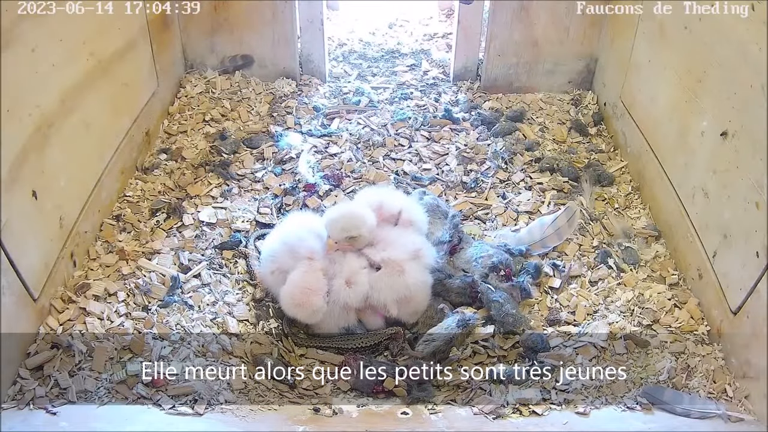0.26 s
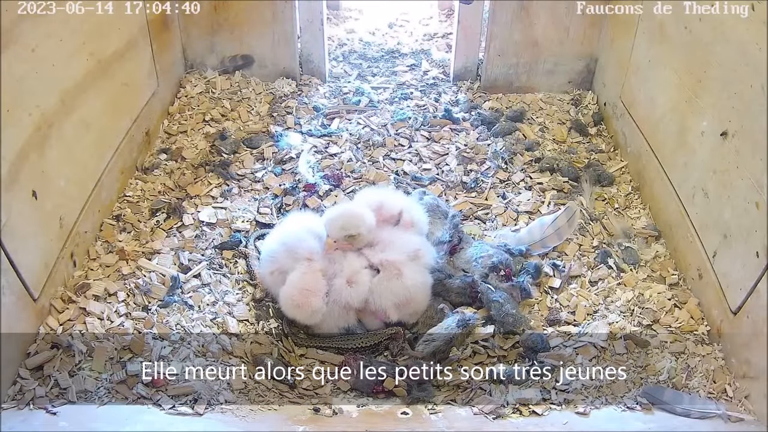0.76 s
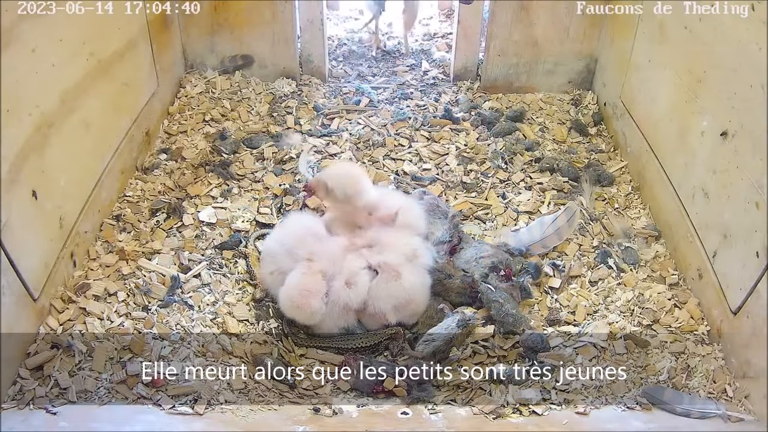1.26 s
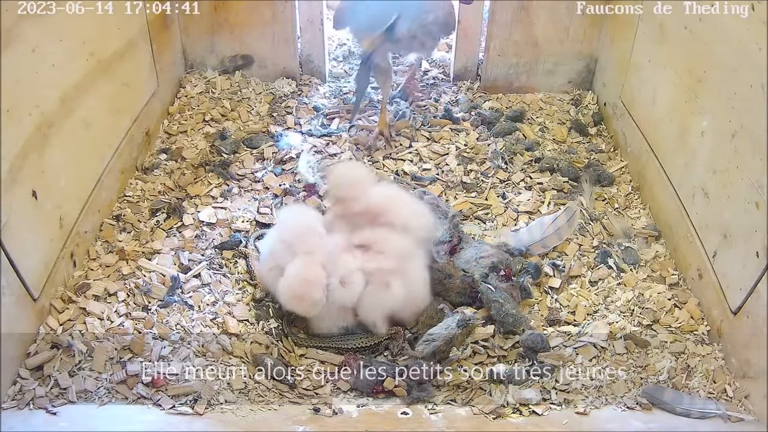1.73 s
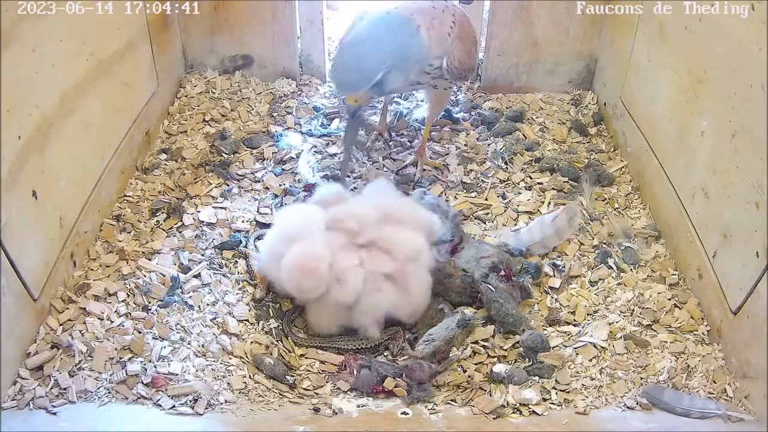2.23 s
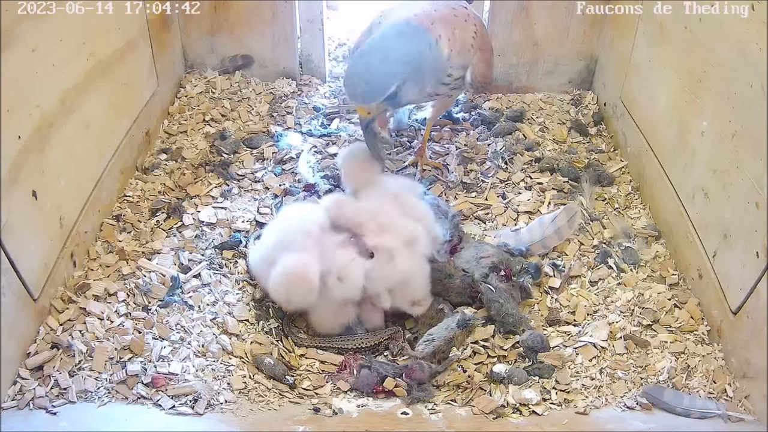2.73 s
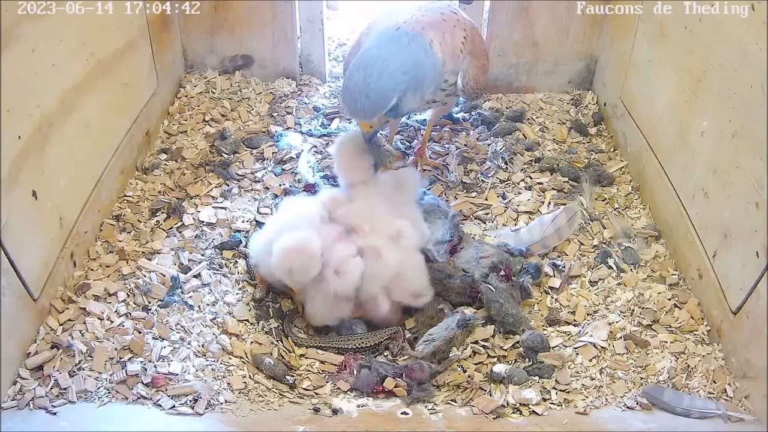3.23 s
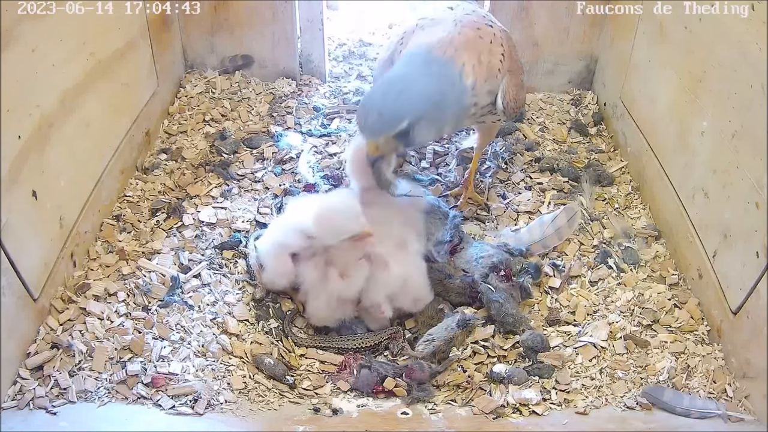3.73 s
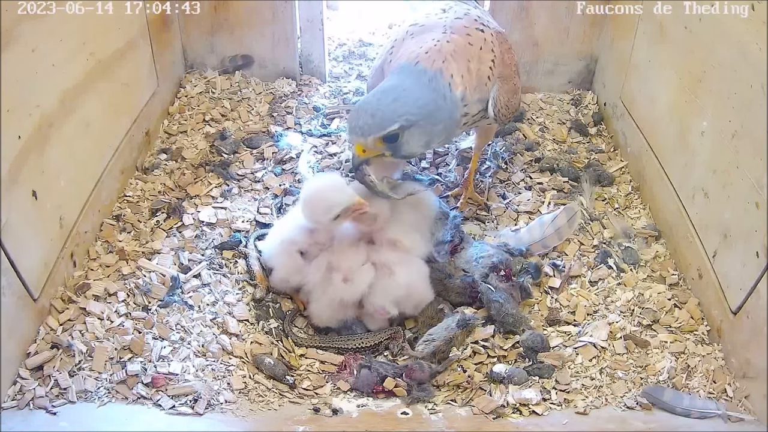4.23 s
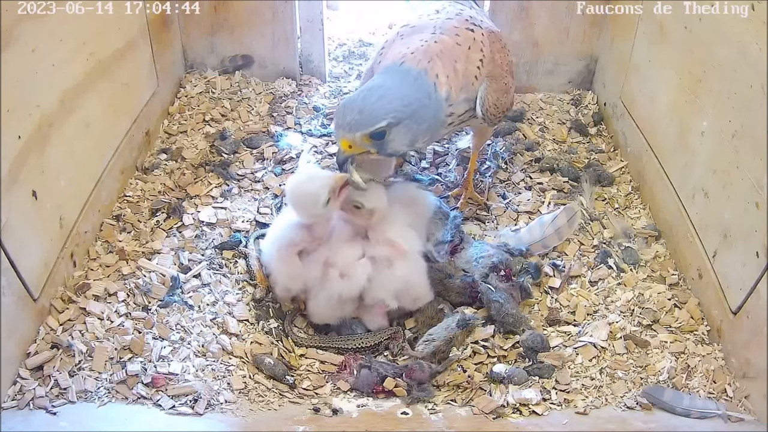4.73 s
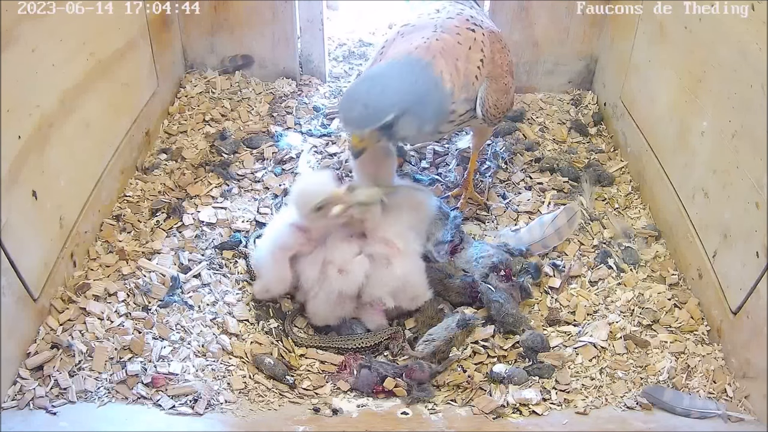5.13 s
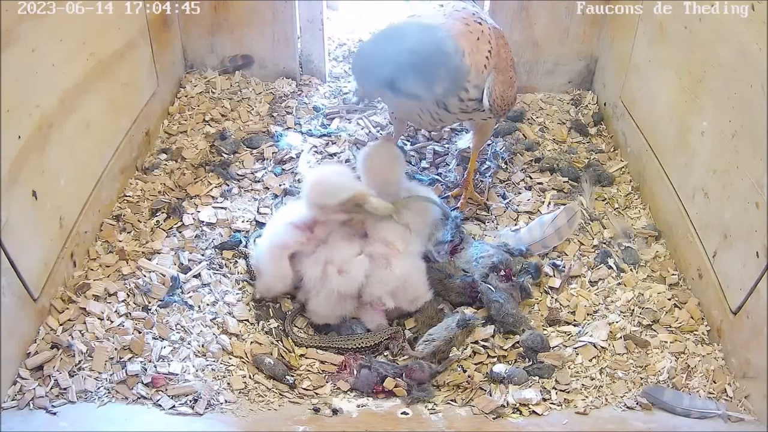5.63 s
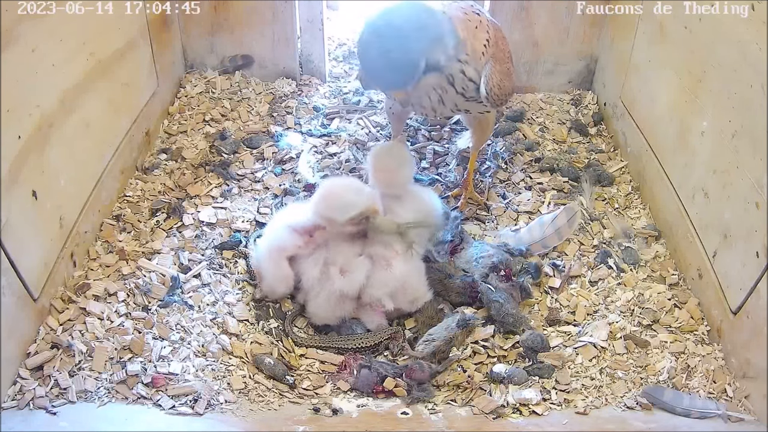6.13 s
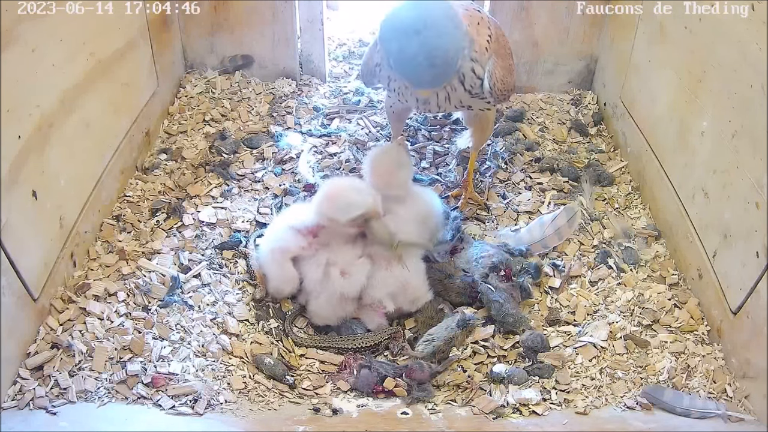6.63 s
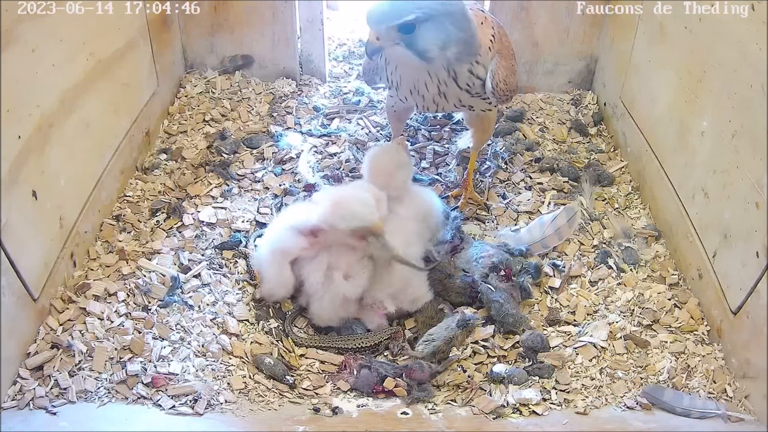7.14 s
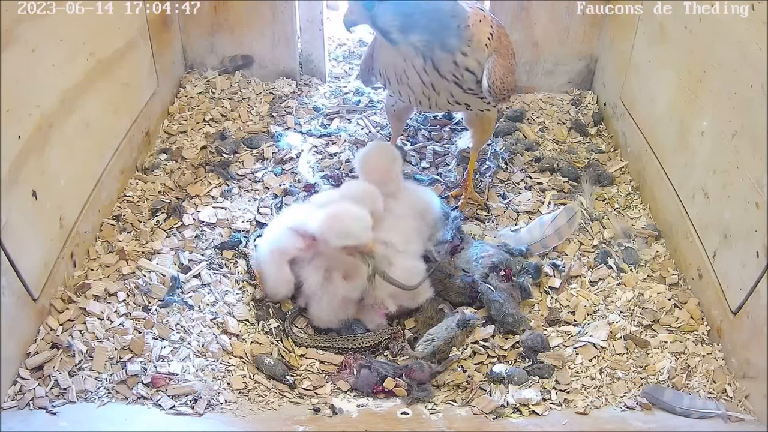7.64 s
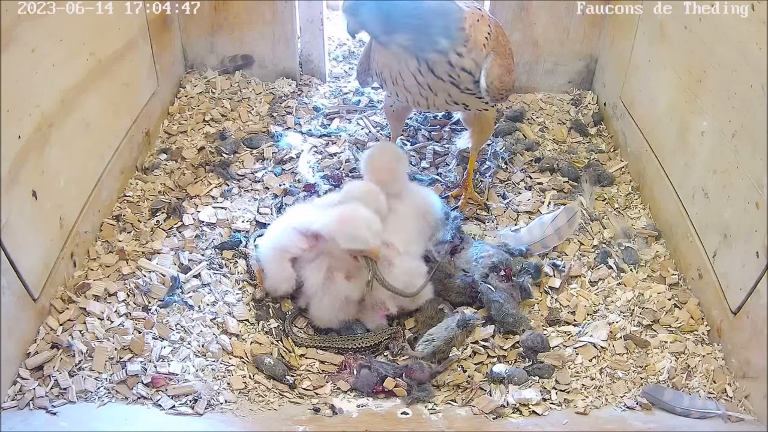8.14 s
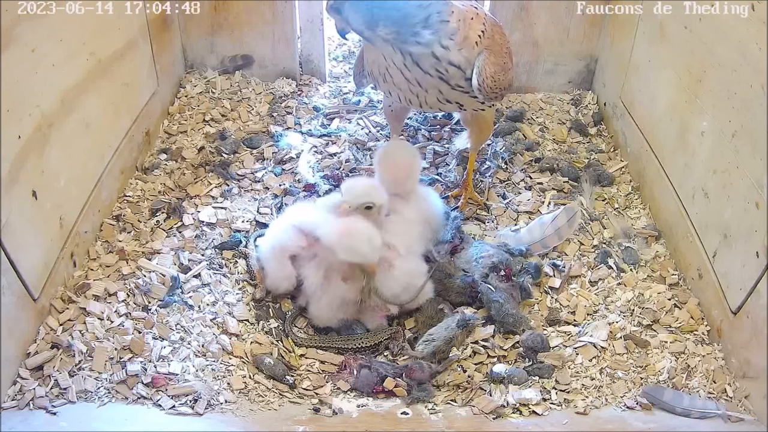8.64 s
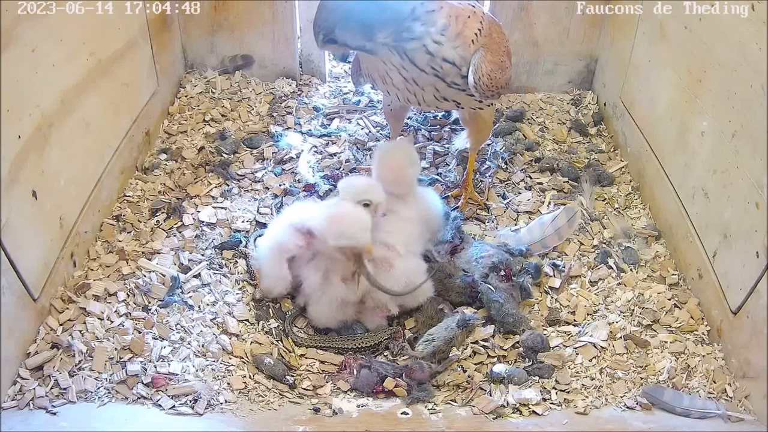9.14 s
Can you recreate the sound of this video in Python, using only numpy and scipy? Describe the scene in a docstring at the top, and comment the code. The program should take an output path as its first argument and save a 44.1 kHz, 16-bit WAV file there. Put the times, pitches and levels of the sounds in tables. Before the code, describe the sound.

Inside a plywood box, soft begging whines and claw knocks, five piercing adult falcon chips, then ten hoarse, stuttering chick squeals and thin whistles.

```python
"""Inside a plywood nest box, close to a small microphone, kestrel chicks whine over a low outside rumble. The
adult lands with a few knocks, walks in over the litter and gives five sharp chips, each after a beak click.
Then one chick squeals nine times with both sides of its syrinx, the first call breaking off briefly midway,
stutters and ends each call in a falling squeak, while others whistle and whine; the rumble swells unevenly and
is loudest at the end. Voices are unsteady oscillators, knocks are struck resonances, and litter, rumble and
hiss are shaped noise."""
import sys
import numpy as np
from scipy import signal
from scipy.fft import rfft, irfft, next_fast_len
from scipy.io import wavfile
from scipy.ndimage import uniform_filter1d, map_coordinates

SR = 44100
rng = np.random.default_rng(int(sys.argv[2]) if len(sys.argv) > 2 else 0)


def put_to_file(sound):
    """Save the sound as 16-bit audio at rate SR, in the file named by the first command-line argument."""
    columns = np.atleast_2d(sound).T  # one column per channel
    safe = np.clip(columns, -1, 1)
    whole_steps = np.round(safe * 32767)
    wavfile.write(sys.argv[1], SR, whole_steps.astype(np.int16))


N = 413658
T = np.arange(N) / SR

# Levels in the tables are relative: the function of each source adds its own trim in dB.
# Squeals. Each row: end in seconds, moment of the break in seconds, hoarseness there 0-1, closing squeak in dB.
SQUEALS = [(4.51, 4.5, 0.4, -66), (4.694, 4.6, 0.56, -39.5), (5.28, 5.19, 0.38, -36.5),
           (5.884, 5.8, 0.63, -37.5), (6.428, 6.43, 0.52, -29), (6.988, 6.96, 0.56, -29.5),
           (7.561, 7.36, 0.43, -32.5), (8.132, 8.06, 0.37, -32), (8.731, 8.53, 0.2, -33.5),
           (9.29, 9.25, 0.34, -28.5)]
# Upper side of the syrinx, one pitch curve a squeal. Each point: time in seconds, pitch in Hz.
UPPER_PITCHES = [
    [(4.246, 3250), (4.344, 3480), (4.358, 3140), (4.444, 3010), (4.49, 3140)],
    [(4.53, 3110), (4.646, 2990), (4.696, 3040)],
    [(4.971, 3100), (5.013, 3270), (5.117, 3315), (5.139, 3080), (5.187, 3460), (5.255, 3280), (5.28, 2860)],
    [(5.551, 3220), (5.57, 2970), (5.673, 3370), (5.701, 3030), (5.79, 3220), (5.875, 3190)],
    [(6.13, 3150), (6.176, 3000), (6.232, 3440), (6.34, 3120), (6.385, 3240), (6.42, 3140)],
    [(6.669, 3120), (6.725, 3138), (6.771, 3260), (6.917, 3300), (6.98, 3060)],
    [(7.23, 3150), (7.27, 3085), (7.305, 3270), (7.42, 3280), (7.53, 3480), (7.562, 3270)],
    [(7.834, 3100), (7.928, 3405), (8.026, 3110), (8.082, 3220), (8.134, 3184)],
    [(8.387, 3160), (8.487, 3050), (8.521, 3340), (8.6, 3270), (8.623, 3420), (8.732, 3310)],
    [(9.03, 3200), (9.066, 3010), (9.11, 3160), (9.195, 3375), (9.238, 3190), (9.285, 3230)],
]
# Upper side of the syrinx, one level curve a squeal. Each point: time in seconds, level in dB.
UPPER_LEVELS = [
    [(4.26, -63), (4.488, -57), (4.5, -58)],
    [(4.53, -50), (4.538, -57), (4.69, -48)],
    [(4.97, -64), (4.976, -55), (5.26, -56)],
    [(5.55, -58), (5.83, -56.5), (5.87, -48)],
    [(6.14, -46.5), (6.264, -51), (6.41, -50.5)],
    [(6.675, -46.5), (6.795, -52.5), (6.98, -49)],
    [(7.235, -48.5), (7.317, -54.5), (7.55, -45.5)],
    [(7.84, -49), (8.102, -50.5), (8.125, -43.5)],
    [(8.39, -49.5), (8.696, -44), (8.72, -50.5)],
    [(9.03, -49.5), (9.234, -43), (9.28, -48)],
]
# Held notes of the lower side. Each row: start in seconds, end in seconds, pitch in Hz, glide in Hz,
# level in dB, swell in dB, closing fall in seconds, rattle 0-1.
LOWER_NOTES = [(4.283, 4.32, 2490, -39, -45, 0, 0.0049, 0.28),
               (4.332, 4.477, 2430, -130, -48, -7, .006, 0.18),
               (4.592, 4.629, 2560, -100, -43.5, -4, .004, 0.37),
               (4.625, 4.708, 2382, -26, -39, -4, 0.028, 0.27),
               (5.116, 5.192, 2430, 70, -51, -17, 0.0045, 0.38),
               (5.193, 5.285, 2420, -110, -45.5, 9, 0.014, 0.29),
               (5.67, 5.762, 2420, -47, -42.5, -1, 0.0037, 0.28),
               (5.791, 5.85, 2490, -3, -44.5, -3, .004, 0.6),
               (6.219, 6.256, 2450, -80, -42.5, 7, 0.0024, 0.24),
               (6.253, 6.332, 2315, -110, -36, 1.5, 0.005, 0),
               (6.333, 6.427, 2314, -6, -36.5, -2, 0.028, 0.39),
               (6.845, 6.932, 2404, -31, -40.5, 8, .004, 0.25),
               (6.929, 6.992, 2380, -40, -43, 8, 0.018, 0.8),
               (7.349, 7.416, 2370, -100, -38, 3.5, 0.004, 0.1),
               (7.422, 7.56, 2320, -110, -37, 7, .016, 0.1),
               (7.878, 8.09, 2466, -130, -38.5, 0.5, 0.0067, 0.13),
               (8.097, 8.135, 2368, -47, -35, 4.5, 0.0085, 0.08),
               (8.461, 8.507, 2430, 43, -36, -3, 0.0056, 0.17),
               (8.532, 8.658, 2347, -30, -37, 6, 0.0056, 0.09),
               (8.655, 8.721, 2280, -28.5, -51.5, -8, 0.0055, 0.3),
               (9.001, 9.086, 2470, -9, -34.5, -0.5, 0.0038, 0.14),
               (9.142, 9.29, 2310, -27, -38.5, 4.5, 0.015, 0.46)]
# Overtones through the open beak. Each row: frequency in Hz, gain in dB.
GAPE = [(4000, -4), (4800, 0), (5250, -12), (5600, 5), (6050, -13), (6550, 4.5), (7000, -11), (8000, -8)]
# Stutters of the lower side. Each row: time in seconds, level in dB.
STUTTERS = [(4.51, -49), (5.795, -41), (5.871, -39), (6.093, -38.5), (6.1185, -46.5), (6.154, -38),
            (6.202, -43), (6.731, -39), (6.776, -40.5), (6.805, -41), (6.8302, -43), (6.9388, -43),
            (6.972, -47), (7.305, -38.5), (7.3345, -44), (7.882, -43), (8.519, -39.5), (8.9347, -35),
            (8.945, -35.5), (9.124, -41), (9.241, -39)]
# Whistles and quavers. Each row: level in dB, then a pitch curve of points in seconds and Hz.
WHISTLES = [(-77, [(.68, 5600), (.71, 5600), (.74, 5840), (.82, 6000), (.87, 6380)]), (-57.5, [(2.01, 2686),
            (2.045, 2470), (2.08, 2640), (2.115, 2330), (2.16, 2640), (2.19, 2236), (2.225, 2620),
            (2.255, 2340)]), (-59.5, [(5.65, 3700), (5.69, 3750), (5.745, 3640), (5.77, 3780),
            (5.805, 3430), (5.84, 3670), (5.865, 3490)]), (-60, [(3.83, 4220), (3.97, 4760), (4.1, 4670),
            (4.17, 4860), (4.205, 4710)]), (-54, [(4.648, 4340), (4.68, 4700), (4.73, 4340), (4.83, 4720),
            (4.87, 4890), (4.98, 4640), (5.025, 4830)]), (-56.5, [(5.4, 4470), (5.45, 4840), (5.54, 5240),
            (5.63, 5050), (5.7, 5460), (5.76, 5070), (5.83, 4880)]), (-57.5, [(6.24, 4300), (6.27, 4880),
            (6.37, 5230), (6.46, 4830), (6.52, 5160), (6.68, 4890)]), (-53, [(7.008, 4340), (7.03, 4600),
            (7.1, 4560), (7.16, 4880), (7.2, 4570), (7.34, 4810), (7.375, 4630)]), (-52.5, [(7.72, 4390),
            (7.82, 4610), (7.9, 4450), (7.98, 4800), (8.045, 4640)]), (-55, [(8.39, 4290), (8.48, 4840),
            (8.565, 4520), (8.62, 4830), (8.797, 4765)]), (-60, [(8.94, 4100), (9.04, 4410), (9.1, 4400)]),
            (-51, [(9.118, 4500), (9.135, 4740), (9.17, 4530), (9.284, 4880)]), (-56, [(9.325, 4930),
            (9.375, 4770)])]
# Soft begging whines. Each row: start in seconds, end in seconds, pitch in Hz, glide in Hz, arch in Hz,
# level in dB, closing fall in seconds, roughness 0-1.
WHINES = [(0.052, .23, 2983, 6, 181.5, -60, 0.011, 0.3), (1.611, 1.652, 2330, 40, 0.5, -53, .005, 0.1),
          (4.24, 4.245, 3040, -200, -0.5, -49.5, 0.021, 0.42),
          (0.226, 0.347, 2900, -40, 50, -54, 0.071, 0.24), (0.65, .76, 2994, 3, -150, -55.5, 0.0057, 0.25),
          (0.758, 0.891, 3080, 68, 2, -62, 0.016, 0.3), (0.905, 0.941, 2815, -250, 33.5, -44.5, 0.055, 0.3),
          (1.249, 1.456, 2985, 202, -150, -51, 0.011, 0.48), (1.462, 1.64, 2970, 7, 1.5, -57.5, 0.01, 0.2),
          (1.477, 1.591, 4680, 0, 111, -63, 0.029, 0.3), (1.69, 1.786, 2645, -320, 6, -47.5, 0.034, 0.4),
          (1.836, 1.881, 2526, -140, 4, -52.5, 0.0075, 0.1), (1.91, 1.942, 2650, 43, 9, -49, 0.012, 0.2),
          (1.961, 2.442, 2830, 59.5, -27, -51.5, 0.077, 0.42),
          (1.99, 2.235, 3380, 60, 7.5, -65.5, 0.028, 0.36), (2.007, 2.07, 3900, 50, 70, -68.5, .02, 0.35),
          (2.716, 2.844, 2630, 1, -100, -58, 0.033, 0.25), (2.892, 3.161, 2623, 78, 35.5, -47.5, 0.047, 0),
          (2.88, 3.191, 2853, -1.5, -88.5, -50.5, 0.039, 0.5),
          (2.894, 3.155, 4320, 498, 41, -58, .01, 0.32),
          (3.503, 3.673, 2572, -100, 61, -43.5, 0.0073, 0.26),
          (3.676, 3.793, 2630, 147.5, 21.5, -50, 0.01, 0.36),
          (3.805, 3.882, 2550, -61.5, 4, -44.5, 0.0092, 0.2),
          (3.9, 3.921, 2530, -84, 2, -44.5, 0.038, 0.53), (6.105, 6.134, 2760, -2, 40, -47.5, 0.023, 0.03),
          (7.626, 7.822, 2830, 177, -1, -47, .01, 0.12),
          (8.278, 8.584, 3670, 1100.5, -10, -59, 0.088, 0.23),
          (8.375, 8.381, 2730, 269, 1, -44, .005, 0.16), (8.833, 9.159, 3400, 137, -86.5, -55, 0.063, 0.26),
          (8.954, 9.02, 3000, 282, -3, -52.5, .01, 0.4), (9.11, 9.15, 6510, 338, 4, -50.5, 0.018, 0.24)]
# The adult's chips. Each row: start in seconds, level in dB, pitch in Hz, octave in dB, croak in dB,
# clear part in seconds, fade in seconds, closing whistle in dB.
CHIPS = [(1.0194, -8.5, 3042, -5, -29, 0.013, 0.0055, -14.5),
         (1.68, -1, 2982, -15.5, -18, 0.0087, 0.0034, -46.5),
         (2.343, -2.5, 2825, -9, -20.5, 0.0087, 0.0021, -23),
         (2.8592, -4.5, 2823, -7, -15.5, 0.011, 0.0021, -25.5),
         (3.488, -5.5, 2943, -5, -13, 0.011, 0.0025, -39)]
# Beak clicks just before each chip. Each row: time in seconds, level in dB.
CLICKS = [(1.0, -14.5), (1.659, -8), (2.321, -13.5), (2.839, -11), (3.469, -11)]
# Resonances of the beak. Each row: frequency in Hz, width in Hz, level in dB.
BEAK = [(980, 190, -2), (1350, 110, -0.5), (2410, 220, 5.5), (3860, 160, -8.5)]
# Feet and claws on the box. Each row: time in seconds, level in dB, thud in dB, scratch in dB.
KNOCKS = [(0.375, -39.5, -21.5, -22), (0.385, -36.5, -36, -7.5), (0.425, -37, -54, -6.5),
          (0.443, -37.5, -33, -4), (0.466, -42, -33, -3.5), (0.591, -28.5, -38, -54),
          (0.62, -37.5, -34, -45), (0.778, -32, -74, -8.5), (0.789, -37, -37, -5), (1.404, -42.5, -50, 2.5),
          (1.947, -55, -25, 13), (3.446, -49, -22.5, 4.5), (3.535, -41, -31, 0.5)]
# Resonances of the plywood. Each row: frequency in Hz, width in Hz, level in dB.
BOARD = [(178, 21, -7), (286.5, 68, -0.5), (432, 280, -2), (698, 300, 1.5), (1160, 76, -12),
         (1335, 69, -7.5), (1980, 164, -3), (2390, 100, -11.5)]
# Wings and feet scuffling in the litter. Each row: start in seconds, length in seconds, level in dB.
SCUFFLES = [(1.13, 0.14, -51.5), (1.444, 0.26, -67), (1.714, 0.12, -49.5), (2.066, 0.13, -51.5),
            (2.21, 0.18, -47)]
# One rough rub: start in seconds, length in seconds, pitch in Hz, glide in Hz, level in dB.
RUB = (5.075, 0.14, 850, 220, -60)
# Level of the outside rumble. Each row: time in seconds, level in dB.
RUMBLE_LEVEL = [(0.0, -64.5), (2.22, -57.5), (3.13, -62), (3.53, -49), (3.79, -55.5), (7.5, -45.5),
                (8.88, -52), (9.12, -49.5), (9.38, -41.5)]
# Litter and the box's hollow note. Each row: time in seconds, rustle in dB, hollow note in dB.
RUSTLE_LEVEL = [(0, -79, -85), (.94, -64.5, -63.5), (1.541, -48, -56.5), (2.271, -57, -59),
                (2.48, -59, -67.5), (3.68, -60.5, -67), (4.02, -72.5, -69.5), (4.729, -72, -77),
                (7.312, -73.5, -68), (9.38, -73.5, -73)]
# Spectrum of the outside rumble. Each row: frequency in Hz, level in dB.
RUMBLE = [(13, -33), (22, 6), (38, 1.5), (92, -9), (151, -7.5), (195, -20), (330, -25), (520, -31),
          (700, -51.5), (2000, -100)]
# Spectrum of the rustling litter. Each row: frequency in Hz, level in dB.
RUSTLE = [(130, -15.5), (190, 9.5), (420, -4.5), (650, -15.5), (950, 7.5), (1370, 5.5), (1800, -9),
          (2600, -10), (8000, -50)]
# Spectrum of the steady hiss. Each row: frequency in Hz, level in dB.
HISS = [(200, 10), (600, -5), (2000, -5.5), (4000, -11.5), (7000, -14), (8000, -23.5), (16000, -20.5)]
# More noise spectra. Each row: frequency in Hz, level in dB.
WHINE_RASP = [(1800, -32.5), (2500, 11.5), (3300, -5.0), (4000, -14.5), (6000, -19.5), (8000, -45.5)]
WHISTLE_HAZE = [(3000, -13.0), (4300, -6.0), (5200, -12.0), (6000, -25)]
CHIP_AIR = [(900, -10.5), (1500, -6.5), (2200, 0.0), (3400, -1.5), (4200, -6.5), (6300, -5.5),
            (7500, -21), (12000, -22.0)]
CLAW = [(1200, 0.0), (3000, 15.0), (6500, -6.5), (8000, -44.5)]
GRAINS = [(180, 11), (300, -1), (400, 8), (600, 2), (1000, 3.5), (2500, -7.5), (7000, -41)]
HOLLOW = [(150, -27.0), (255, -15.5), (295, -1.5), (340, -22.5), (370, -6.5), (394, 5.5), (430, -7),
          (700, -27.0), (3000, -61.5)]

ATTACK_S, WHINE_ATTACK_S, CHIP_ATTACK_S = 0.0017, .012, 0.0013
WHISTLE_FALL_S, UPPER_FALL_S = 0.039, 0.021
WHINE_DB, WHISTLE_DB, UPPER_DB, LOWER_DB = 1.5, 2.5, 0.5, -1  # trims
EFFORT_DB, EFFORT_PER_S = 3.5, 43  # the push within a call is uneven
BREAK_S = 0.15  # half the length of a break in the voice
CLEAR_ROUGH = .14  # roughness of the upper side away from its breaks
RATTLE_HZ = 67.6  # mean stalls a second of a hoarse membrane
# the pitch drops ever faster once the pressure is let go, down to a voice's limit below its note
FALL_HZ_PER_S, FALL_HZ_PER_S2, MAX_FALL_HZ = 9000, 350000, 860
TOP_HZ = 15900  # highest frequency kept


def squealing():
    """Both sides of one syrinx mix into sum tones: the upper leads, the lower joins in broken notes."""
    upper, lower = np.zeros((2, N), complex)
    for curve, levels, (end, breaks, hoarse, _) in zip(UPPER_PITCHES, UPPER_LEVELS, SQUEALS):
        s, hz = np.transpose(curve)
        t = T[int(s[0] * SR):int((end + UPPER_FALL_S) * SR)]
        near_break = np.exp(-((t - breaks) / BREAK_S) ** 2)
        rough = np.clip(CLEAR_ROUGH + (hoarse - CLEAR_ROUGH) * near_break, 0, 1)
        level = np.interp(t, *np.transpose(levels)) + UPPER_DB
        voice = syrinx(t, end, np.interp(t, s, hz), level, jitter=.001 + .028 * rough,
                       shimmer=.08 + .7 * rough, uneven=.5)
        add(upper, s[0], voice * stalls(len(t), .7 * rough))
    for start, end, hz, glide_hz, db, swell_db, fall_s, rattle in LOWER_NOTES:
        t, u, pitch = contour(start, end, fall_s, hz, glide_hz, 0)
        level = db + LOWER_DB + swell_db * (u - .5)
        voice = syrinx(t, end, pitch, level, jitter=.0015 + .016 * rattle,
                       shimmer=.03 + .5 * rattle, uneven=.2 + rattle)
        add(lower, start, voice * stalls(len(t), rattle))
    # the gape keeps changing, so the overtones come and go
    gape = undb(3.5 * wander(N, 16))
    mixed = undb(-19.5) * overtone(upper, upper)
    mixed += undb(-26.5) * overtone(upper, lower)
    mixed += undb(-33.5) * overtone(lower, lower)
    return upper.imag + lower.imag + gape * colour(mixed, GAPE)


def stutters(pip_hz=2450, length_s=0.014):
    """The lower side catches for about a hundredth of a second, at an unsteady pitch."""
    out, n = np.zeros(N), int(length_s * SR)
    for s, db in STUTTERS:
        phase = turn(pip_hz * (1 + .03 * wander(n, 400)))
        add(out, s - .001, undb(db + 5.5) * np.hanning(n) * np.sin(phase))
    return out


def squeaks():
    """Each squeal collapses in a falling squeak; once a small squeak rises."""
    out = np.zeros(N)
    for end, *_, db in SQUEALS:
        falling = squeak(start_hz=2890, end_hz=1700, length_s=0.033, overtone_db=-17.5)
        add(out, end, undb(db - 2.5) * falling)
    rising = squeak(start_hz=1710, end_hz=1924, length_s=0.0239, overtone_db=-3.5)
    add(out, 4.562, undb(-46.0) * rising)
    return out


def whistling():
    """Chicks give weaving whistles with a faint haze of noise that follows their strength."""
    tones, air = np.zeros((2, N))
    for db, curve in WHISTLES:
        s, hz = np.transpose(curve)
        t = np.arange(int(s[0] * SR), int((s[-1] + WHISTLE_FALL_S) * SR)) / SR
        voice = syrinx(t, s[-1], np.interp(t, s, hz), db + WHISTLE_DB, jitter=.004, shimmer=.13,
                       uneven=.6, attack_s=WHINE_ATTACK_S)
        add(tones, s[0], voice.imag)
        add(air, s[0], np.abs(voice))
    return tones + undb(-24.5) * air * noise(N, WHISTLE_HAZE)


def whining():
    """Small chicks whine in nearly pure tones, with a weak octave and a little rasp around them."""
    tones, octaves, air = np.zeros((3, N))
    for start, end, hz, glide_hz, arch_hz, db, fall_s, rough in WHINES:
        t, _, pitch = contour(start, end, fall_s, hz, glide_hz, arch_hz)
        voice = syrinx(t, end, pitch, db + WHINE_DB, jitter=0.035 * rough, shimmer=rough,
                       attack_s=min(WHINE_ATTACK_S, end - start))
        add(tones, start, voice.imag)
        add(octaves, start, overtone(voice, voice))
        add(air, start, rough * np.abs(voice))
    # the open beak passes only the highest octaves
    octaves = signal.sosfilt(signal.butter(3, 5400, "high", fs=SR, output="sos"), octaves)
    rasp = air * noise(N, WHINE_RASP)
    return tones + undb(-36.5) * octaves + undb(-11.5) * rasp


def chips(leap_hz=3400, croak_hz=1450, whistle_hz=6150, rise_hz=110):
    """The adult's chip: a hard clear tone leaps upward, breaks into a croak and dies in a thin whistle."""
    out, t = np.zeros(N), T[:int(.15 * SR)]
    for s, db, hz, octave_db, croak_db, clear_s, fade_s, whistle_db in CHIPS:
        after = np.maximum(t - clear_s, 0)
        broken = 1 - np.exp(-after / 0.001)
        size = (1 - np.exp(-t / CHIP_ATTACK_S)) * np.exp(-after / fade_s)
        pitch = hz + rise_hz * (np.minimum(t / clear_s, 1) - .5) + (leap_hz - hz) * broken
        phase = turn(pitch * (1 + (0.0066 + 0.054 * broken) * wander(len(t), 1200)))
        flutter = 1 + (.09 + .6 * broken) * wander(len(t), 700)
        octave = undb(octave_db + 2.5) * (1 - broken) * np.sin(2 * phase)
        tone = flutter * (np.sin(phase) + octave)
        croak_phase = turn(croak_hz * (1 + 0.076 * wander(len(t), 900)))
        croak = undb(croak_db + 13.0) * (0.087 + broken) * np.sin(croak_phase)
        air = noise(len(t), CHIP_AIR)
        whistle_size = undb(whistle_db) * np.exp(-((t - clear_s - .011) / 0.0045) ** 2)
        whistle = whistle_size * np.sin(2 * np.pi * whistle_hz * t)
        rasp = (undb(-17) * size + undb(-34.0) * np.exp(-t / 0.02)) * air
        add(out, s, undb(db - 5.5) * (size * (tone + croak) + whistle + rasp))
        # the voice swells faintly just before it speaks
        lead = T[:int(.008 * SR)]
        onset = np.sin(turn(np.full(len(lead), hz))) + 0.44 * air[:len(lead)]
        add(out, s - .008, undb(db - 24.5) * lead / lead[-1] * onset)
    return out


def knocks():
    """Beak clicks, and feet that thump and scratch: blows ring the resonances of beak and plywood."""
    out = np.zeros(N)
    for s, db in CLICKS:
        add(out, s, undb(db - 8.0) * ring(contact(decay_s=0.01, grit=0.059), BEAK))
    for s, db, thud_db, scratch_db in KNOCKS:
        push = contact(decay_s=0.0068, grit=0.14)
        thud = undb(thud_db + 30.0) * ring(push, [m for m in BOARD if m[0] < 500])
        rap = ring(push, [m for m in BOARD if m[0] >= 500])
        claw = noise(len(push), CLAW) * np.exp(-T[:len(push)] / 0.016)
        add(out, s, undb(db + 1.5) * (thud + rap + undb(scratch_db - 7.5) * claw))
    return out


def scuffles(grains_per_s=900):
    """Each scuffle is a swell of small grains of litter rubbing on the hollow floor."""
    swell = np.zeros(N)
    for s, length_s, db in SCUFFLES:
        add(swell, s, undb(db) * np.hanning(int(length_s * SR)) ** .5)
    grains = rng.standard_normal(N) * (rng.random(N) < grains_per_s / SR)
    return swell * unit(colour(grains, GRAINS))


def rubbing():
    """A brief, rough rub whose hollow pitch rises."""
    s, length_s, hz, glide_hz, db = RUB
    out, n = np.zeros(N), int(length_s * SR)
    tone = np.sin(turn(hz + glide_hz * np.linspace(-.5, .5, n)))
    add(out, s, undb(db) * signal.windows.tukey(n) * wander(n, 220) * tone)
    return out


def background():
    """Outside rumble, the hollow note of the box, litter rustling in uneven patches and a steady hiss."""
    s, *columns = np.transpose(RUSTLE_LEVEL)
    rustle_db, hollow_db = (np.interp(T, s, c) for c in columns)
    rumble_db = np.interp(T, *np.transpose(RUMBLE_LEVEL))
    rumble = undb(rumble_db + 1.0 + 1.0 * wander(N, 14)) * lumpy(noise(N, RUMBLE))
    hollow = undb(hollow_db + 5.5 + 3.5 * wander(N, 8)) * noise(N, HOLLOW)
    litter, rustle = noise(N, RUSTLE), 0
    edges = np.geomspace(100, 8000, 7)
    for band in zip(edges, edges[1:]):  # each band swells on its own
        patch = undb(2.2 * wander(N, 14))
        rustle = rustle + patch * bandpass(litter, band)
    rustle = undb(rustle_db - 2.0 + 0.94 * wander(N, 150)) * unit(rustle)
    return rumble + hollow + rustle + undb(-67.5) * noise(N, HISS)


def lumpy(x):
    """Each low band swells and sinks on its own."""
    edges = np.geomspace(15, 700, 10)
    return unit(sum(undb(3.5 * wander(N, 9)) * bandpass(x, band) for band in zip(edges, edges[1:])))


def syrinx(t, end, hz, db, jitter, shimmer, uneven=1, attack_s=ATTACK_S):
    """One vibrating membrane as a complex tone; after the end the pressure fades and the pitch falls."""
    n, after = len(t), np.maximum(t - end, 0)
    size = undb(db) * np.minimum((t - t[0]) / attack_s, 1) * (1 - (after / after[-1]) ** 2) ** 2
    fall = FALL_HZ_PER_S * after + FALL_HZ_PER_S2 * after ** 2
    fall = fall * min(1, MAX_FALL_HZ / fall[-1])
    unsteady = .006 * uneven * wander(n, 45) + jitter * wander(n, 700)
    flutter = np.maximum(1 + shimmer * (.8 * wander(n, 130) + .45 * wander(n, 500)), 0)
    effort = undb(EFFORT_DB * uneven * wander(n, EFFORT_PER_S))
    tone = np.exp(1j * turn((hz - fall) * (1 + unsteady)))
    return np.sqrt(2) * size * effort * flutter * tone


def overtone(a, b, full_db=-42):
    """The sum tone of two complex tones; it grows faster than they do, so loud notes are brighter."""
    product = a * b / undb(2 * full_db)
    return undb(full_db) * product.imag / (np.abs(product) + 1e-9) ** .25


def stalls(n, rattle):
    """Gain of a hoarse membrane that stalls and restarts many times a second."""
    phase = turn(RATTLE_HZ * (1 + .25 * wander(n, 40)))
    stall = .5 + .5 * np.tanh(3 * np.sin(phase) - 1)
    return np.maximum(1 + rattle * (.5 - 2 * stall), 0)


def contour(start, end, fall_s, hz, glide_hz, arch_hz):
    """Times, progress 0-1 and pitch of a call: it glides, and arches with the push in its middle."""
    t = np.arange(int(start * SR), int((end + max(fall_s, .002)) * SR)) / SR
    u = np.clip((t - start) / (end - start), 0, 1)
    return t, u, hz + glide_hz * (u - .5) + arch_hz * np.sin(np.pi * u)


def squeak(start_hz, end_hz, length_s, overtone_db):
    """A fast throbbing slide with two overtones."""
    n = int(length_s * SR)
    phase = turn(np.linspace(start_hz, end_hz, n) * (1 + 0.031 * wander(n, 706)))
    throb = 1 + 0.5 * np.sin(turn(np.full(n, 115)) + rng.uniform(0, 2 * np.pi))
    tone = np.sin(phase) + undb(overtone_db) * np.sin(2 * phase) + undb(2 * overtone_db) * np.sin(3 * phase)
    return signal.windows.tukey(n, .35) * throb * tone


def contact(decay_s, grit):
    """A blow followed by a brief gritty scrape."""
    t = T[:int(.12 * SR)]
    return signal.unit_impulse(len(t)) + grit * rng.standard_normal(len(t)) * np.exp(-t / decay_s)


def ring(push, modes):
    """A push rings damped (Hz, width, dB) modes; peak 1."""
    t = T[:len(push)]
    body = np.zeros(len(t))
    for k, (hz, width, db) in enumerate(modes):  # neighbours ring in opposite sense
        body += (-1) ** k * undb(db) * np.exp(-np.pi * width * t) * np.sin(2 * np.pi * hz * t)
    y = signal.fftconvolve(push, body)[:len(t)]
    return y / np.abs(y).max()


def undb(db):
    """Decibels to gain."""
    return 10 ** (np.asarray(db) / 20)


def unit(x):
    """Scale to rms 1."""
    return x / np.sqrt(np.mean(x ** 2))


def add(out, s, x):
    """Mix x into out at time s."""
    i = max(int(s * SR), 0)
    out[i:i + len(x)] += x[:max(len(out) - i, 0)]


def wander(n, hz):
    """Smooth chance with about hz turns a second and a spread near 1."""
    at = np.arange(n) * hz / SR
    return map_coordinates(rng.standard_normal(4096), [at + 2], order=2, mode="wrap")


def turn(hz):
    """Phase of an oscillator that follows hz."""
    return 2 * np.pi * np.cumsum(hz) / SR


def bandpass(x, band):
    """Keep one band between two edges in Hz, with gentle slopes."""
    return signal.sosfilt(signal.butter(1, band, "band", fs=SR, output="sos"), x)


def noise(n, points):
    """Noise of rms 1 with a spectrum of (Hz, dB) points."""
    return unit(colour(rng.standard_normal(n), points))


def colour(x, points):
    """Shape x with a spectrum of (Hz, dB) points; it falls away below the first."""
    hz, db = np.transpose(points)
    size = next_fast_len(len(x))
    f = np.maximum(np.fft.rfftfreq(size, 1 / SR), 1)
    gain = undb(np.interp(np.log(f), np.log(hz), db)) * np.minimum(f / hz[0], 1) ** 2
    return irfft(rfft(x, size) * gain, size)[:len(x)]


def scene():
    """All the birds near the microphone, the brief ring of the box around them, and the background."""
    voices = squealing() + stutters() + squeaks() + whistling() + whining() + chips()
    near = voices + knocks() + scuffles() + rubbing()
    t = T[:int(.1 * SR)]
    decay = np.exp(-t / .003) + undb(-38) * np.exp(-t / .03)
    walls = rng.standard_normal(len(t)) * (t > .001) * decay
    echo = undb(-13) * signal.fftconvolve(near, walls / np.linalg.norm(walls))[:N]
    return (near + echo + background())[None]


def record(dry):
    """A faint hiss rides on the sound in step with its level; the top is cut."""
    hiss = undb(-29.0) * uniform_filter1d(np.abs(dry), size=64) * rng.standard_normal(dry.shape)
    return signal.sosfilt(signal.ellip(10, .2, 70, TOP_HZ, fs=SR, output="sos"), dry + hiss)


dry = scene()
out = record(dry)
put_to_file(out)
```